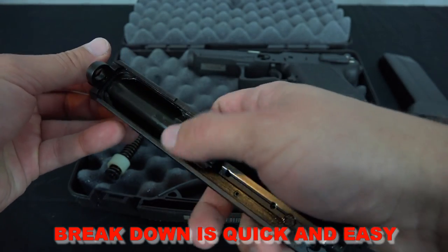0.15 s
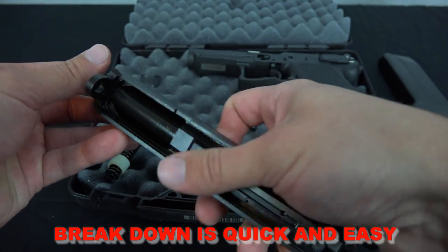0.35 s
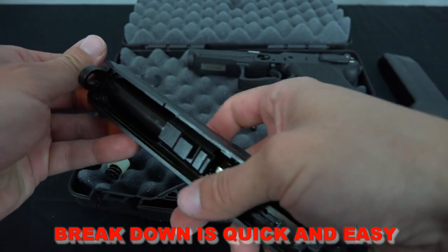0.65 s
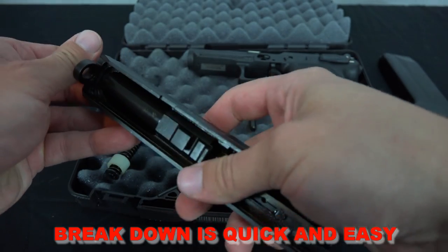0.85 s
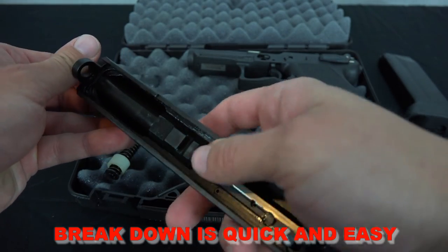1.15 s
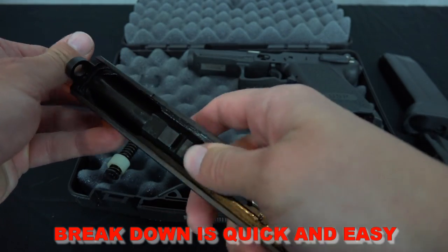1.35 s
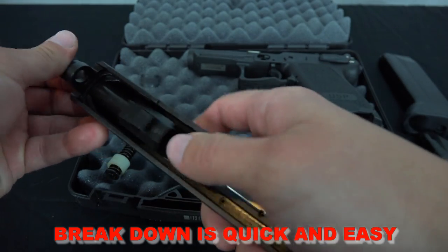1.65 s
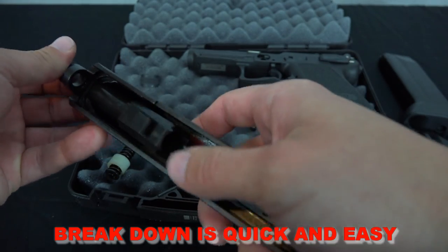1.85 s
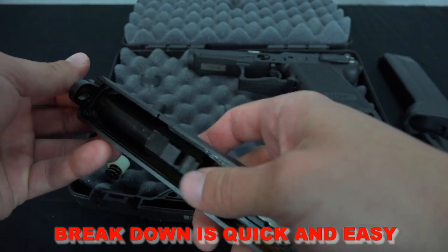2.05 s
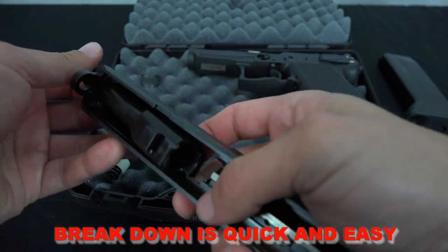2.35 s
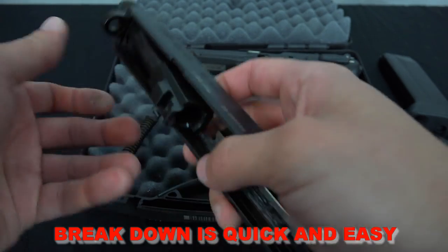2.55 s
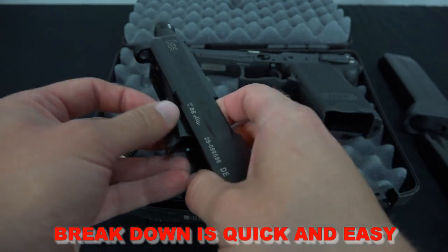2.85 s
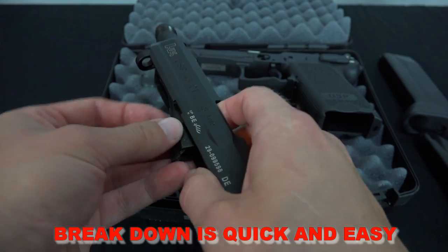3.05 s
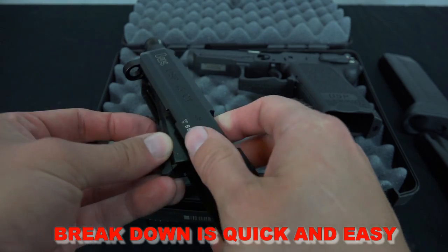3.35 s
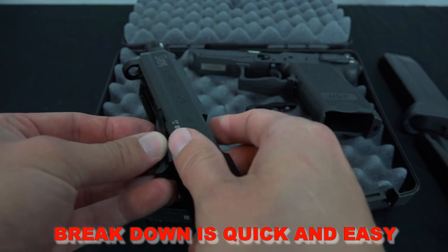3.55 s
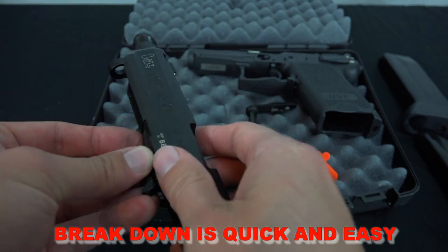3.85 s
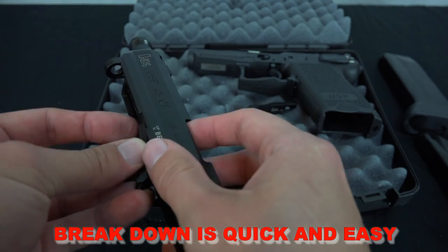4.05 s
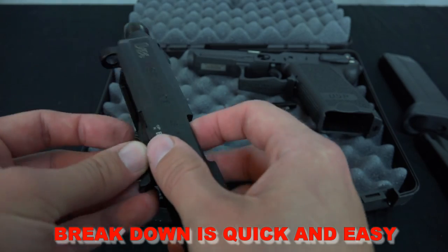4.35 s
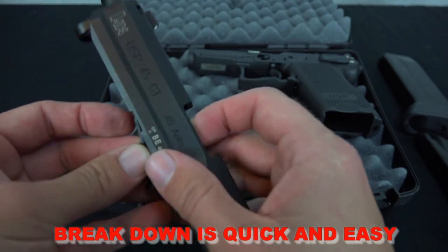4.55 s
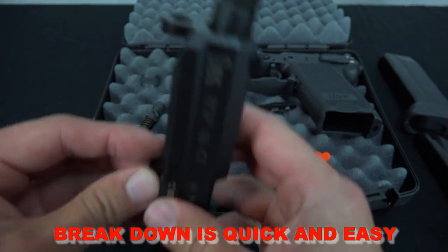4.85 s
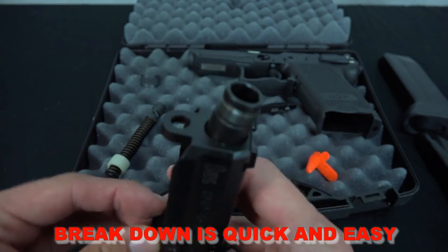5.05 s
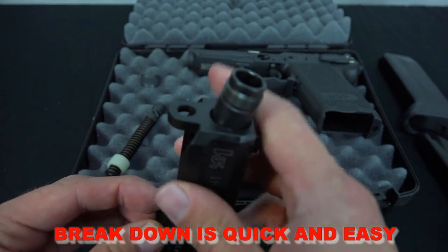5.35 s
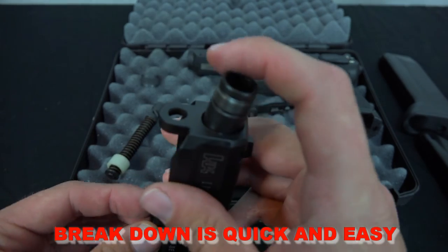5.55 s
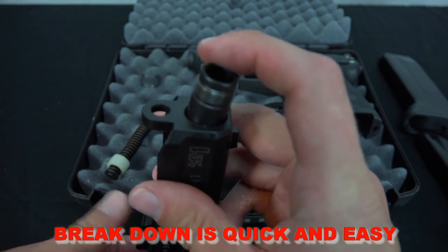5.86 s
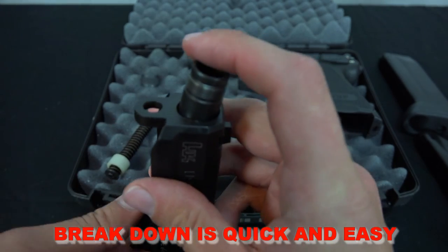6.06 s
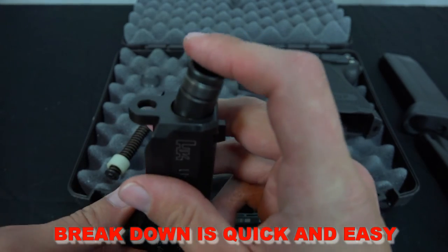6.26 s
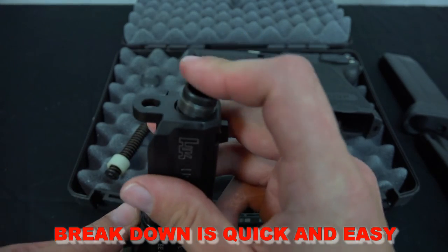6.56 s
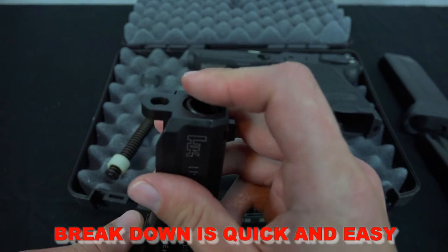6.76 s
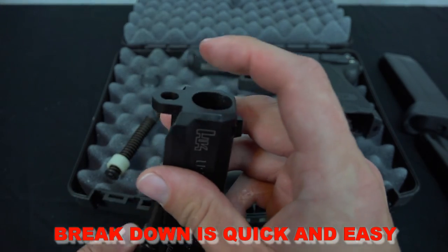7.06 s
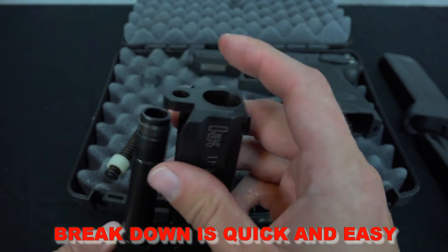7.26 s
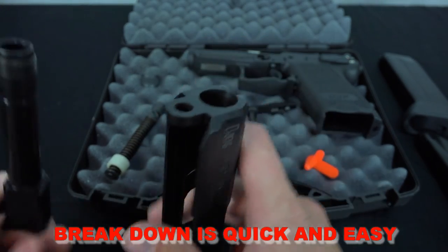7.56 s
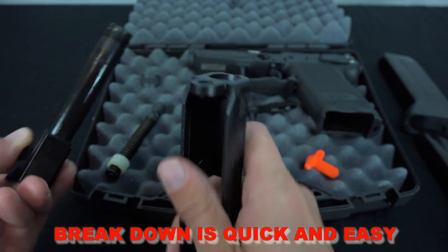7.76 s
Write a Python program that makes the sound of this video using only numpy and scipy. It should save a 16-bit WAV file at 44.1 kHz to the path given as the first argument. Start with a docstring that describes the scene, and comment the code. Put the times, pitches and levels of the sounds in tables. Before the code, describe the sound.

Very close in a small room, a hard steel catch snaps, then snaps again about a second later. A dense burst of bright metallic knocks and gritty rubbing follows, then sparser faint clicks. A soft low bump hits the table; finally the barrel scrapes and clacks through the opening, ringing as it comes free. Low hum and airy ventilation slowly grow underneath.

```python
"""A sharp steel catch snaps, close up in a small room, as hands work a barrel out of a pistol slide.
The barrel grinds and knocks in the slide, something bumps the table, then the barrel is pushed through
and rings as it comes free. Impacts and rough rubbing drive banks of resonances, with hand rumble, thuds
and a faint whistle from noise bands. Mains hum (wavering sines) and ventilation (shaped noise) slowly swell."""
import sys
import numpy as np
from scipy import signal
from scipy.fft import rfft, irfft, next_fast_len
from scipy.io import wavfile

SR = 44100
rng = np.random.default_rng(int(sys.argv[2]) if len(sys.argv) > 2 else 0)


def digitize_waveform(pressure):
    """Quantize a signal to 16-bit integers and store it at the path in sys.argv[1].

    Rows of a 2-D input are taken as channels; values are limited to [-1, 1].
    """
    field = np.atleast_2d(pressure).T
    bounded = np.clip(field, -1, 1)
    quanta = np.round(bounded * 32767).astype(np.int16)
    wavfile.write(sys.argv[1], SR, quanta)


N = 349001
TIME = np.arange(N) / SR

# small catch snaps: [t/s, ring peak level/dB, brightness/dB per octave, boost of narrow resonances/dB]
CATCH_SNAPS = [(0.0076, 1, 1.5, -4.5), (0.1752, -8, 17, -63), (1.0383, 4, -2, -36), (1.1883, -24.5, -10, 5),
               (3.068, -28.5, 22, 5), (3.2393, -20.5, 8, -3), (3.7717, -7.5, 5.5, -12),
               (4.126, -8.5, 17, -10.5)]
# resonances of the catch, the wide ones damped by the fingers: [f/Hz, width/Hz, level/dB]
CATCH_MODES = [(1417, 39, -6), (2137, 340, -14.5), (2500, 560, -8), (3170, 410, -0.5), (3468, 240, -4),
               (3800, 880, -12), (4280, 25, 9.5), (4520, 99, -13.5), (5685, 380, -11), (6300, 230, -6.5),
               (6430, 160, -2.5), (7270, 210, -12.5), (8280, 77, -14.5), (9350, 300, -28.5),
               (10490, 270, -25), (11300, 1100, -25), (14000, 510, -36)]


def catch_snaps():
    """The small catch snaps: a hard touch and its chatter ring the catch."""
    return knocks(CATCH_SNAPS, CATCH_MODES, chatter=0.18, chatter_s=0.0026, crack_db=-19, scatter_db=2.3)


RUN_UP_S, RUN_UP_DB, RUN_UP_TILT = 0.026, -39, 12   # length/s, level against the snap/dB, dB per octave


def run_ups():
    """A short rising rub of the catch belongs to every snap; one due before the start begins at 0 s."""
    return [(s - RUN_UP_S, RUN_UP_S, 0, db + RUN_UP_DB, RUN_UP_TILT) for s, db, _, _ in CATCH_SNAPS]


# barrel knocks in the slide: [t/s, ring peak level/dB, brightness/dB per octave, boost of narrow resonances/dB]
SLIDE_KNOCKS = [(0.1537, -24, -14, -2), (0.7731, -29, -2.5, -8), (1.003, -25, -8.5, -15),
                (1.2875, -3.5, -2, -6.5), (1.4945, -2, 2.5, 0), (1.5915, -3, 6, -3), (1.787, -1.5, -10, 10),
                (1.815, -6, 8, -10), (1.8868, -5, -2.5, 7), (2.0556, -0.5, 11, -3), (2.0606, -2, 12, 17),
                (2.1817, 0.5, 7.5, -3), (3.0512, -13.5, -21, -35), (3.5056, -25, 0, 2),
                (3.9845, -37, -8, 2), (4.2185, -31, 2, -3), (4.3163, -21.5, -1.5, -1.5),
                (4.4635, -23, 1, 0), (5.5548, -28, 8, -18.5), (7.8017, -29, -5, 4)]
# pushes of the barrel along the slide: [start t/s, swell/s, fade/s, top rms level/dB, brightness/dB per octave]
SLIDE_STROKES = [(1.276, 0.01, .005, -34.5, -7), (1.476, 0.015, 0.026, -13.5, 6),
                 (1.505, 0.048, 0.072, -15.5, -2), (1.637, 0.042, 0.044, -17.5, -3),
                 (1.722, 0.017, 0.053, -15.5, -6), (1.887, 0.005, 0.016, -13, -8),
                 (1.912, 0.026, .025, -37, -12), (1.969, 0.054, 0.024, -18.5, -5.5),
                 (2.03, 0.022, 0.02, -11.5, 7), (2.162, 0.0051, 0.011, -18.5, 3),
                 (2.275, 0.046, 0.033, -25, 9), (2.52, .03, .01, -46, 14), (2.94, 0.04, 0.042, -44, 0.5),
                 (3.052, 0.0068, 0.013, -30, -25), (3.23, 0.0082, 0.012, -35, 7),
                 (3.31, .025, 0.035, -45, 0), (3.52, 0.026, 0.032, -34.5, 5), (4.005, .024, .026, -33.5, 3),
                 (4.092, .018, 0.017, -30, 6), (4.75, .05, .06, -55, 16), (5.3, 0.039, 0.15, -53, 22),
                 (7.803, 0.007, .05, -37, -3)]
# resonances of the slide, the wide ones damped by the fingers: [f/Hz, width/Hz, level/dB]
SLIDE_MODES = [(1400, 280, -34.5), (2047, 134, -10.5), (2720, 486, -6), (2953, 102, 8), (3270, 428, 1.5),
               (3347, 91, 10), (4200, 220, -16.5), (5410, 27, -3.5), (5700, 180, -10.5), (6102, 51, -2.5),
               (6350, 57, -9.5), (6980, 180, -11.5), (7110, 84, -5.5), (8030, 500, -27.5),
               (10300, 250, -33), (10430, 200, -36), (11200, 460, -32), (12700, 160, -18.5),
               (13500, 1100, -40)]
# how freely the gripped slide rings during pushes: [t/s, boost of narrow resonances/dB]
SLIDE_FREEDOM = [(1.5, -5), (2.3, -14.5), (3.0, -2), (7.799, -7)]
SLIDE_SWELL_DB = 12.5   # a push starts and ends this far under its top


def slide_work():
    """The barrel knocks and grinds in the gripped slide; the catch's run-up rubs ring the slide too."""
    hits = knocks(SLIDE_KNOCKS, SLIDE_MODES, chatter=.1, chatter_s=.0011, crack_db=-18, scatter_db=1.2)
    grinding = strokes(SLIDE_STROKES + run_ups(), SLIDE_MODES, SLIDE_FREEDOM, SLIDE_SWELL_DB,
                       per_s=3500, spread_db=2.0, judder_db=2.0, judder_hz=118.2, grit_db=-20)
    return hits + grinding


# loosened barrel against the muzzle opening:
# [t/s, ring peak level/dB, brightness/dB per octave, boost of narrow resonances/dB]
BARREL_KNOCKS = [(6.2731, -31, 13.5, -9), (6.4672, -26.5, -6, 2), (6.5058, 0, 6.5, -16),
                 (6.5462, -2, -4, -12), (6.7014, -17.5, -4, -7), (6.9385, -19, -6.5, -4),
                 (7.089, -9.5, 16.5, -9), (7.1165, -10, 4, -10), (7.1568, -1.5, 2, 0), (7.1843, 3, 9, -12)]
# pushes through the muzzle opening: [start t/s, swell/s, fade/s, top rms level/dB, brightness/dB per octave]
BARREL_STROKES = [(6.119, 0.033, 0.027, -46, 0.5), (6.21, 0.02, 0.017, -41.5, 6),
                  (6.485, .032, 0.07, -12.5, 0), (6.59, 0.058, 0.02, -22.5, -6.5),
                  (6.728, 0.012, 0.036, -17, -8), (6.862, 0.049, 0.057, -24.5, -11.5),
                  (7.046, 0.043, .055, -18, -3.5), (7.157, 0.055, 0.036, -17.5, -1),
                  (7.239, 0.064, 0.021, -23, -2)]
# resonances of the barrel, the wide ones damped by the fingers: [f/Hz, width/Hz, level/dB]
BARREL_MODES = [(1199, 22, -13), (1486, 92, -20), (2054, 13, -5.5), (2480, 14.5, 6.5), (2518, 160, -4.5),
                (2897, 123, -1), (3130, 200, -13.5), (3276, 43, -4), (4050, 490, -23.5), (5750, 130, -14.5),
                (6007, 20.3, 8), (6180, 510, -14), (6420, 31, -1), (7100, 60, -16), (8120, 170, -18),
                (9460, 87, -27), (9490, 135, -21.5), (11000, 230, -26.5), (13000, 620, -60)]
# the barrel rings more freely during pushes as it leaves the slide: [t/s, boost of narrow resonances/dB]
BARREL_FREEDOM = [(6.5, -8), (7.3, 3)]
BARREL_SWELL_DB = 11.5   # a push starts and ends this far under its top


def barrel_work():
    """The loosened barrel strikes and scrapes the muzzle opening, ringing as it comes free."""
    hits = knocks(BARREL_KNOCKS, BARREL_MODES, chatter=0.3, chatter_s=0.00098, crack_db=-12.5, scatter_db=2.7)
    scraping = strokes(BARREL_STROKES, BARREL_MODES, BARREL_FREEDOM, BARREL_SWELL_DB,
                       per_s=4000, spread_db=3, judder_db=3.5, judder_hz=110, grit_db=-10.0)
    return hits + scraping


def knocks(rows, modes, chatter, chatter_s, crack_db, scatter_db):
    """One hard touch, then a few milliseconds of chatter as the faces settle."""
    out, t = np.zeros(N), np.arange(SR // 50) / SR
    for s, db, tilt, ring_db in rows:
        force = chatter * rng.standard_normal(len(t)) * np.exp(-t / chatter_s)
        force[0] = 1
        ring = resonate(force, modes, tilt, ring_db, scatter_db)
        add(out, s, from_db(db) * ring / np.abs(ring).max())
        crack = cut(force, [1200, 10000], "band", order=1)
        add(out, s, from_db(db + crack_db + tilt) * crack)   # brighter knocks crack louder
    return out


RUB_DAMPING_HZ = 11.3   # rubbing contact widens every resonance by this much
RUB_DETUNE = .004   # and shifts it by up to this share, differently at each push


def strokes(rows, modes, freedom, depth_db, per_s, spread_db, judder_db, judder_hz, grit_db):
    """Dense collisions, clumped by stick and slip, drive the part's resonances, which the contact damps."""
    out = np.zeros(N)
    for start, swell_s, fade_s, db, tilt in rows:
        pressure = from_db(db) * push(swell_s, fade_s, depth_db)
        size = len(pressure)
        judder = from_db(judder_db * slow_noise(judder_hz, size))
        force = pressure * rms_one(asperities(size, per_s, spread_db) * judder)
        rubbed = [(hz * (1 + RUB_DETUNE * rng.uniform(-1, 1)), width + RUB_DAMPING_HZ, level_db)
                  for hz, width, level_db in modes]
        ring_db = np.interp(start, *np.transpose(freedom))
        ring = resonate(force, rubbed, tilt, ring_db, scatter_db=1.1)
        same_energy = np.sqrt(np.sum(force ** 2) / np.sum(ring ** 2))
        add(out, start, ring * same_energy)
        grit = cut(force, [1000, 7500], "band")
        add(out, start, from_db(grit_db) * grit)
    return out


def push(swell_s, fade_s, depth_db, ease_s=0.0013):
    """Pressure of one push: it breaks loose, swells to its top, fades and sticks."""
    t = np.arange(max(round((swell_s + fade_s + ease_s) * SR), SR // 100)) / SR
    level_db = np.interp(t, [0, swell_s, swell_s + fade_s], [-depth_db, 0, -depth_db])
    return from_db(level_db) * np.sqrt(signal.windows.tukey(len(t), 2 * ease_s * SR / len(t)))


def asperities(size, per_s, spread_db):
    """Tiny random collisions between two rough faces."""
    born = rng.random(size) < per_s / SR
    strength = from_db(spread_db * np.minimum(rng.exponential(1, size), 3))
    return born * rng.choice([-1, 1], size) * strength


def resonate(force, modes, tilt=0, ring_db=0, scatter_db=0):
    """Parallel resonances; contact point varies their strengths, grip mutes or frees the narrow ones."""
    out = 0
    drive = np.convolve(np.pad(force, (0, SR // 3)), [1, 0, -1]) + 1e-18
    for k, (hz, width, db) in enumerate(modes):
        r = np.exp(-np.pi * width / SR)
        octaves = np.clip(np.log2(hz / 3000), -.7, 1.1)
        narrow = np.exp(-width / 80)
        gain = from_db(db + tilt * octaves + ring_db * narrow + scatter_db * rng.standard_normal())
        feed = [(-1) ** k * gain * (1 - r * r) / 2]   # neighbours alternate in sign
        out = out + signal.lfilter(feed, [1, -2 * r * np.cos(2 * np.pi * hz / SR), r * r], drive)
    return out


# soft bumps on the table: [t/s, force level/dB, contact time/s]
BUMPS = [(5.1417, -1, 0.0021), (5.1517, -9.5, 0.0015), (5.157, -12.5, 0.0039)]
# resonances of the table: [f/Hz, width/Hz, level/dB]
TABLE_MODES = [(24, 27, 14.5), (66, 29, 8.5), (138, 60, 4.5), (212, 11.5, 10.5), (303, 21, -7),
               (390, 11, 3.5), (540, 60, -37), (1620, 1200, -16)]


def table_bump(scuff_db=-18, scuff_t60=0.13, rustle_db=-45, rustle_t60=1.0):
    """Soft pushes, heard directly and through the table's modes, with a scuff and a fading rustle."""
    force, t = np.zeros(N), np.arange(SR // 2) / SR
    for s, db, contact_s in BUMPS:
        add(force, s, from_db(db) * np.hanning(round(contact_s * SR)) ** 2)
    direct = cut(force + 1e-18 * rng.standard_normal(N), 30, "high", order=1)
    out = direct + resonate(force, TABLE_MODES)[:N]
    scuff = rng.standard_normal(len(t)) * from_db(scuff_db - 60 * t / scuff_t60)
    rustle = rng.standard_normal(len(t)) * from_db(rustle_db - 60 * t / rustle_t60)
    add(out, BUMPS[0][0], cut(scuff, [1100, 2600], "band") + cut(rustle, 9000, "low", order=1))
    return out


# the pushed barrel thuds into the palm: [t of the top/s, f/Hz, rms level at the top/dB]
PALM_THUDS = [(6.535, 192.5, -30), (6.651, 255, -27.5)]
THUD_FADE_DB_PER_S = 330   # on both sides of the top
# the hands shift and rumble: [t of the top/s, rms level at the top/dB, fade/dB per s]
HAND_SHIFTS = [(5.2, -25.5, 82), (6.5, -33, 30), (7.58, -41, 45)]
SHIFT_RISE_DB_PER_S = 350
HOLLOW_HZ, HOLLOW_DB = 394, -35   # the fist rings hollow under the barrel's pushes
HOLLOW_FOLLOWS = 0.39   # share of the pushes' dB swing


def handling():
    """Low rumble of moving hands, partly different at each port; hollow rub and thuds in the fist."""
    pressure = np.zeros(N)
    for start, swell_s, fade_s, db, _ in BARREL_STROKES:
        add(pressure, start, from_db(db) * push(swell_s, fade_s, BARREL_SWELL_DB))
    hollow = from_db(HOLLOW_DB) * pressure ** HOLLOW_FOLLOWS * murky(HOLLOW_HZ, width_hz=90)
    thuds = sum(from_db(db - THUD_FADE_DB_PER_S * np.abs(TIME - s)) * murky(hz, width_hz=55)
                for s, hz, db in PALM_THUDS)
    shifts = sum(from_db(db - np.maximum(SHIFT_RISE_DB_PER_S * (s - TIME), fade * (TIME - s)))
                 for s, db, fade in HAND_SHIFTS)
    shared = slow_noise(32)
    separate = np.array([slow_noise(29), slow_noise(35.5)])
    rumble = rms_one(cut(shared + 1.3 * separate, 4.9, "high"))
    return hollow + thuds + shifts * rumble


def murky(hz, width_hz):
    """A sine at a steady or moving pitch, blurred into a narrow noise band; rms 1."""
    phase = 2 * np.pi * np.cumsum(hz * np.ones(N)) / SR
    return rms_one(slow_noise(width_hz) * np.sin(phase))


# hands glide over the steel: [t of the top/s, length/s, level at the top/dB]
GLIDES = [(0.08, 0.29, -68), (0.36, 0.17, -68), (2.87, .6, -63), (6.03, .3, -74)]
# whistle lines at full speed: [f/Hz, relative level/dB]
WHISTLE_LINES = [(7800, -5), (10400, -3.5), (11500, 0), (13300, 1.5)]
WHISTLE_SAG = .17   # share of the pitch lost at the slow ends of a glide


def whistle():
    """Thin lines whose pitch and level rise and fall with the speed of each glide."""
    level, pitch = np.zeros(N), np.ones(N)
    for s, length_s, db in GLIDES:
        slowness = (2 * (TIME - s) / length_s) ** 2
        level += from_db(db) * np.maximum(1 - slowness, 0)
        pitch -= WHISTLE_SAG * slowness * (slowness < 1)
    lines = sum(from_db(db) * murky(hz * pitch, width_hz=70) for hz, db in WHISTLE_LINES)
    return level * rms_one(lines)


def glances(x):
    """Faint reflections off the hands and other near surfaces within 2 ms, different at each port."""
    paths = rng.standard_normal((2, SR // 500))
    paths *= from_db(-15) / np.sqrt(paths.shape[1])
    return signal.fftconvolve(x[None], paths, axes=1)[:, :N]


# time for the room to die by 60 dB: [f/Hz, decay/s]
ROOM_DECAY = [(100, 0.24), (1000, 0.37), (3000, 0.19), (6000, 0.24), (14000, 0.23)]
ROOM_DB = -12
TAIL_SPREAD = .9   # separate noise at each port against the shared noise


def room(x, first_echo_s=0.0041):
    """Diffuse echoes that die band by band, partly different at the two ports."""
    t, edges, tail = np.arange(SR * 3 // 4) / SR, np.geomspace(60, SR * .4, num=9), 0
    for low, high in zip(edges, edges[1:]):
        noise = rng.standard_normal(len(t)) + TAIL_SPREAD * rng.standard_normal((2, len(t)))
        decay_s = at_hz(ROOM_DECAY, np.sqrt(low * high))
        tail = tail + cut(noise, [low, high], "band") * from_db(-60 * t / decay_s)
    tail = tail * np.clip(t / first_echo_s - 1, 0, 1)   # silent up to the first echo, then fading in
    return signal.fftconvolve(x[None], rms_one(tail) / np.sqrt(len(t)), axes=1)[:, :N]


# where the hands work: [t/s, left minus right level/dB]
HAND_PLACE = [(0, 2.5), (4.3, 1), (5.1, 0), (6.9, 0.5), (7.2, 1)]
PORT_LAG_S = 4.2e-5


def ports(pair):
    """The work sits a little to the left: the right port hears it later and mostly softer."""
    size = next_fast_len(N + SR // 100)
    late = np.exp(-2j * np.pi * np.fft.rfftfreq(size, 1 / SR) * PORT_LAG_S)
    right = irfft(rfft(pair[1], size) * late, size)[:N]
    balance_db = in_time(HAND_PLACE)[0] / 2 * np.array([[1], [-1]])
    return np.array([pair[0], right]) * from_db(balance_db)


# hum lines before the swell and left-right balance: [f/Hz, rms level/dB]
HUM_LINES = [(27.5, -53), (86, -66.5), (119.9, -47), (182, -61.5), (238, -62)]
# ventilation spectrum, scaled as a whole afterwards: [f/Hz, relative level/dB]
AIR_SPECTRUM = [(18, -21.5), (32, -11.5), (48, -20.5), (85, -16.5), (140, -8), (185, -12), (366, -20),
                (480, -24.5), (810, -24.5), (2450, -34), (7220, -42.5), (16000, -50)]
# how alike the ventilation is at the two ports: [f/Hz, likeness 0 to 1]
AIR_LIKENESS = [(30, 0.28), (250, 0.34), (1000, 0.44), (4000, 0.53), (12000, .2)]
# ventilation balance: [f/Hz, left minus right level/dB]
AIR_BALANCE = [(30, -12), (70, -18.5), (180, -3.5), (550, -0.5), (1650, -.5), (15000, .5)]
AIR_DB = -47   # rms before the swell
SWELL_START_DB, SWELL_DB_PER_S = -1.06, 1.0669   # the background grows steadily


def background():
    """Slightly wavering hum, stronger on the right, over ventilation noise partly alike at both ports."""
    hz, sides = np.fft.rfftfreq(N, 1 / SR), np.array([[1], [-1]])
    mid, side = rfft(rng.standard_normal((2, N))) * from_db(at_hz(AIR_SPECTRUM, hz))
    alike = np.clip(at_hz(AIR_LIKENESS, hz), 0, 1)
    pair = mid + np.sqrt((1 - alike) / (1 + alike)) * side * sides
    pair = pair * from_db(sides * at_hz(AIR_BALANCE, hz) / 2)
    air = from_db(AIR_DB) * rms_one(irfft(pair, N))
    hum = sum(from_db(db) * np.sqrt(2) * np.sin(2 * np.pi * f * TIME + .1 * slow_noise(2.6))
              for f, db in HUM_LINES)
    swell = from_db(SWELL_START_DB + SWELL_DB_PER_S * TIME)
    return swell * (air + hum * from_db(-2.4 * sides))


def from_db(db):
    """Decibels to gain."""
    return 10 ** (np.asarray(db) / 20)


def rms_one(x):
    """Scale to rms 1."""
    return x / np.sqrt(np.mean(x ** 2) + 1e-20)


def in_time(rows):
    """Columns of a curve at every sample."""
    s, *columns = np.transpose(rows)
    return [np.interp(TIME, s, c) for c in columns]


def at_hz(points, hz):
    """Read a table on a log-frequency axis."""
    freqs, values = np.transpose(points)
    return np.interp(np.log(hz + 1e-9), np.log(freqs), values)


def add(track, s, sound):
    """Mix a sound into a track from time s, or from 0 if s is earlier."""
    at = max(round(s * SR), 0)
    track[at:at + len(sound)] += sound[:N - at]


def cut(x, hz, kind, order=2):
    """Butterworth filter."""
    return signal.sosfilt(signal.butter(order, np.minimum(hz, .45 * SR), kind, fs=SR, output="sos"), x)


def slow_noise(hz, size=N):
    """Low-passed noise of rms 1, made at every 16th sample and already run in."""
    coarse = cut(rng.standard_normal(size // 16 + 2002), 16 * hz, "low")[2000:]
    return np.interp(np.arange(size) / 16, np.arange(len(coarse)), rms_one(coarse))


def scene():
    """Steel, table and hands in the room, over the whistle and the background."""
    near = catch_snaps() + slide_work() + barrel_work() + table_bump()
    work = near + glances(near) + from_db(ROOM_DB) * room(near) + handling()
    return ports(work) + whistle() + background()


def record(dry):
    """The loudest peaks are rounded off under a ceiling and the top is cut."""
    ceiling = .95
    rounded = dry / (1 + (dry / ceiling) ** 4) ** .25
    low_pass = signal.cheby2(16, 70, 16500, fs=SR, output="sos")   # 70 dB down from 16.5 kHz up
    return signal.sosfilt(low_pass, rounded)


dry = scene()
out = record(dry)
digitize_waveform(out)
```